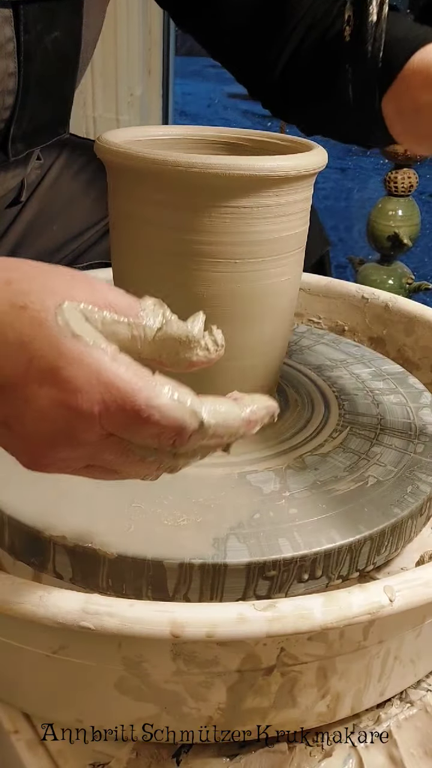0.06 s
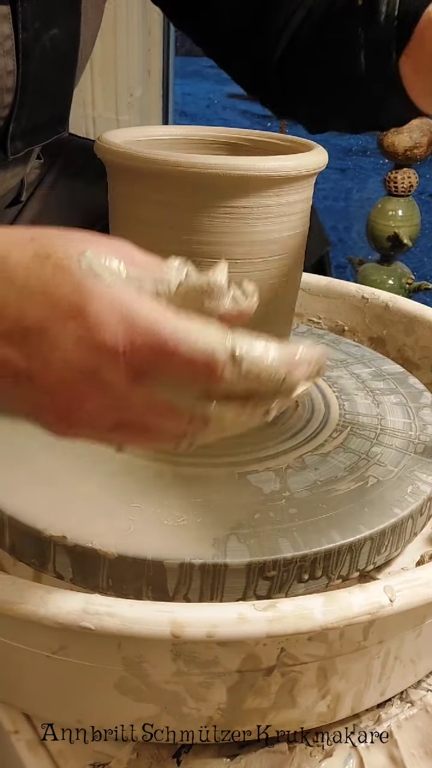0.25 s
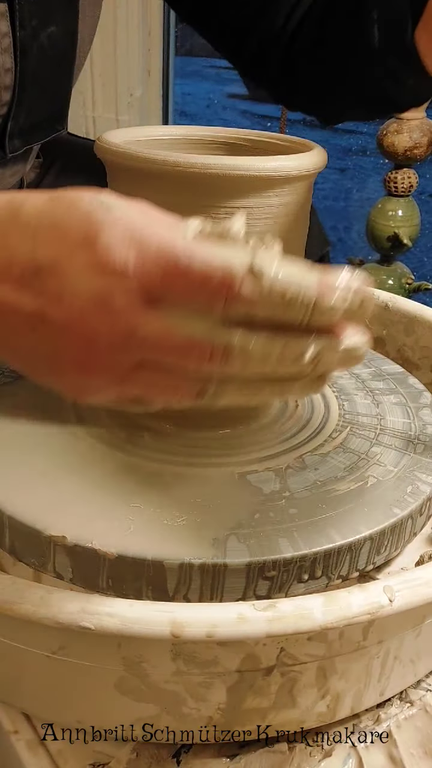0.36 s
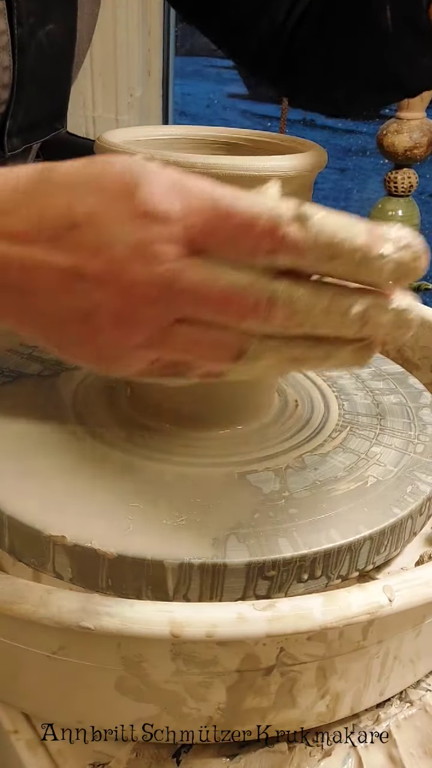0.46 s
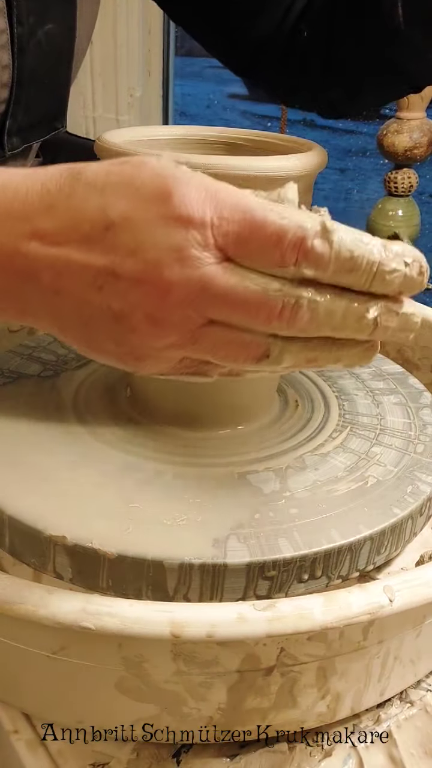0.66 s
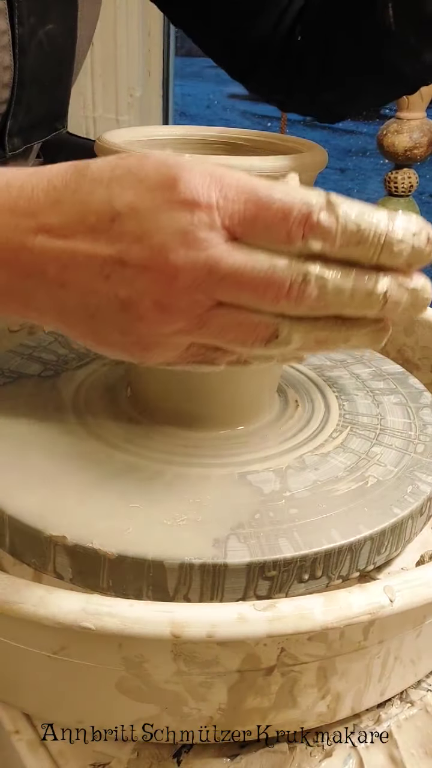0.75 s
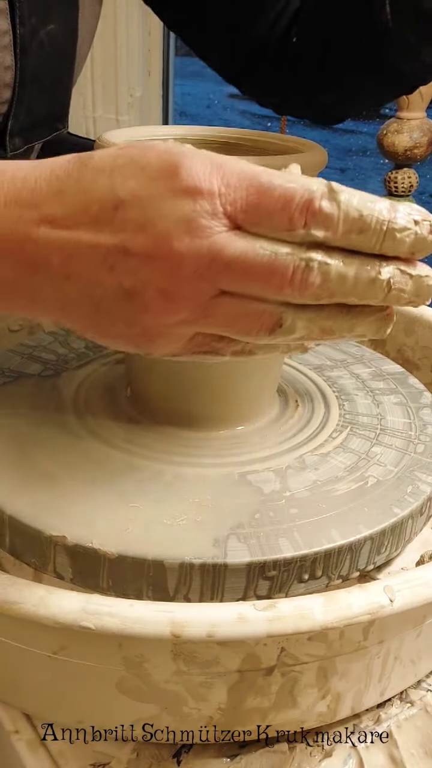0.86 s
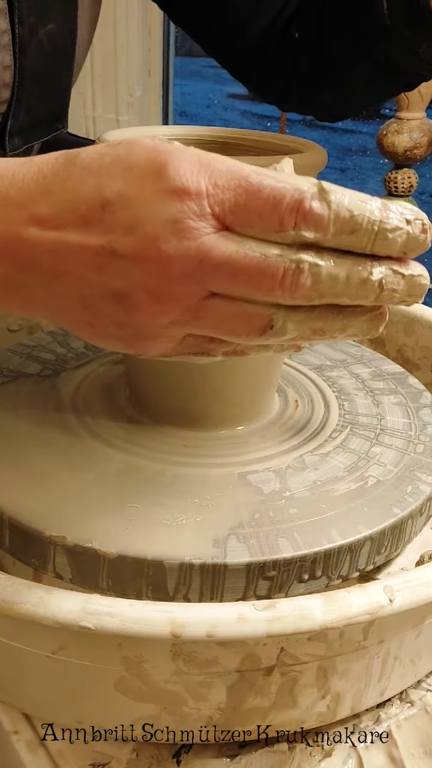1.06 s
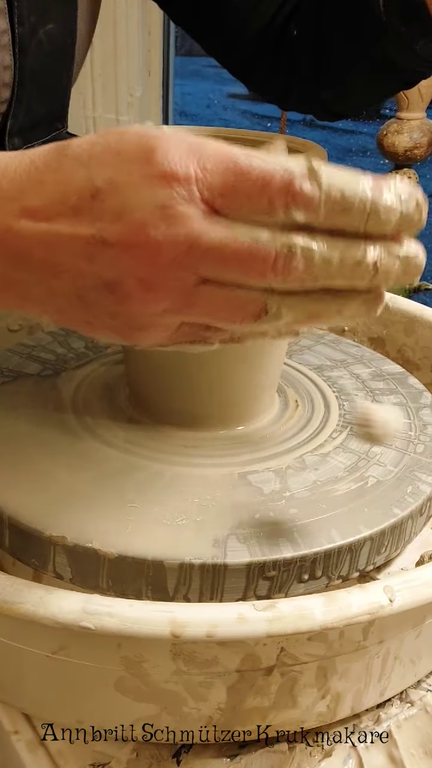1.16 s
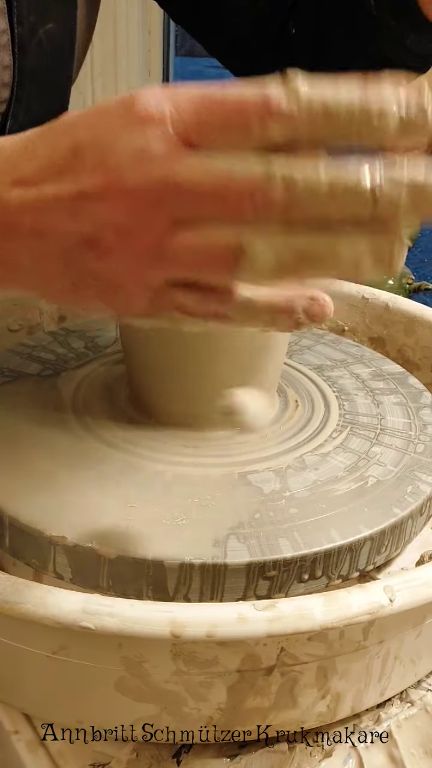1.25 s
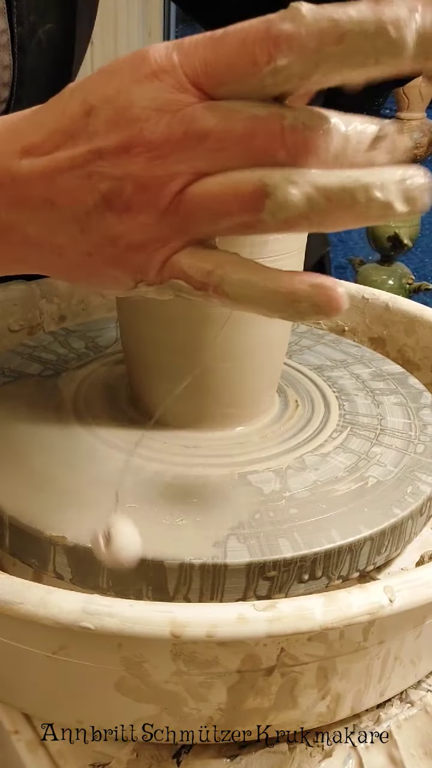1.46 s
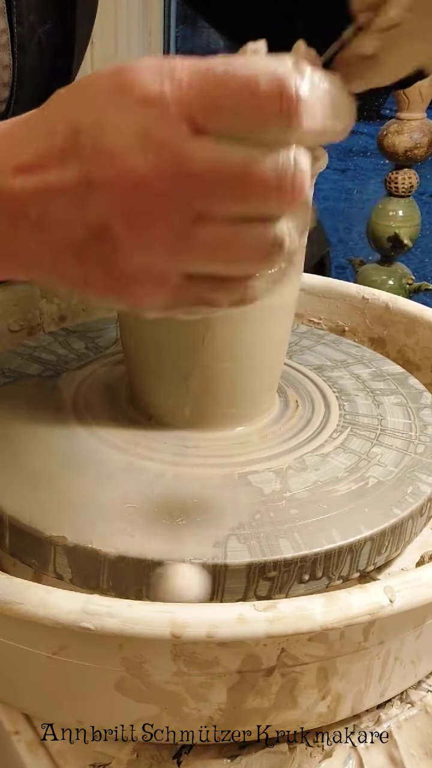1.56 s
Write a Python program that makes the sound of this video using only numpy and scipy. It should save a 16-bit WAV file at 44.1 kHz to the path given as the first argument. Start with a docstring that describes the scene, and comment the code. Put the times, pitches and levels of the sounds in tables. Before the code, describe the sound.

Wet hands rub a clay pot on a turning wheel in short hissing, scraping strokes with thin squeals; dull knocks rattle the tray, then a tap and clack, close stereo microphones in a small quiet studio.

```python
"""Wet hands rub a clay pot on a turning wheel: five strokes hiss, scrape and drum, with thin squeals.
Dull knocks ring the wheel's tray, a hard tap and a clack follow, and wet clay ticks now and then.
Under it all the wheel rumbles, groans, hums and whines in a small, quiet studio.
Shaped noise makes the rubbing and rumble; dying sine modes and noise bursts make the impacts;
drifting sines make the groans and narrow noise makes the squeals."""
import sys
import numpy as np
from scipy import signal
from scipy.fft import rfft, irfft
from scipy.io import wavfile

SR = 44100
rng = np.random.default_rng(int(sys.argv[2]) if len(sys.argv) > 2 else 0)


def dump_mix(stems):
    """Bounce the given channels to the path in sys.argv[1] as a 16-bit WAV at rate SR."""
    frames = np.atleast_2d(stems).T  # one column per channel
    limited = np.clip(frames, -1, 1)  # hard clip at full scale
    pcm = np.round(limited * 32767).astype(np.int16)
    wavfile.write(sys.argv[1], SR, pcm)


N = 70560  # samples: 1.6 s


def amp(db):
    """Decibels to gain."""
    return 10 ** (np.asarray(db) / 20)


def unit(x):
    """Scales to an rms of one."""
    return x / np.sqrt(np.mean(x ** 2) + 1e-20)


def read(points, hz):
    """Reads a curve on a log-frequency axis."""
    f, value = np.transpose(points)
    return np.interp(np.log(hz + 1), np.log(f + 1), value)


def pan(db):
    """Left and right gains; positive leans left."""
    return amp([[db / 2], [-db / 2]])


def add(mix, s, sound):
    """Mixes a sound in at a time in seconds."""
    part = mix[:, round(s * SR):][:, :sound.shape[1]]
    part += sound[:, :part.shape[1]]


def swell(start, end, rise_s, fall_s):
    """Attack, hold and release."""
    t = np.arange(N) / SR
    return np.clip((t - start) / rise_s, 0, 1) * np.clip((end - t) / fall_s, 0, 1)


def wander(rate_hz):
    """Smooth random drift of rms one; its spectrum fades away around the rate."""
    hz = np.fft.rfftfreq(N, 1 / SR)
    fade = np.exp(-(hz / rate_hz) ** 2) * (hz > 0)
    return unit(irfft(rfft(rng.standard_normal(N)) * fade, N))


# Stereo likeness of the two microphones: f/Hz, left-right correlation
LIKENESS = [(50, 0.35), (150, 0.88), (330, 0.85), (700, 0.48), (1400, -0.19), (4000, 0.23), (10000, -0.049)]


def likeness(hz):
    """How alike left and right are at a frequency, from -1 to 1."""
    return np.clip(read(LIKENESS, hz), -1, 1)


def stereo_pair(a, b, same):
    """Left is the first signal; right shares as much of it as the likeness asks."""
    return np.array([a, same * a + np.sqrt(1 - same ** 2) * b])


# Stereo balance of broad noise and squeals: f/Hz, left over right/dB
BALANCE = [(50, 3), (150, 7.5), (350, -0.5), (700, 1.5), (1400, 2), (3200, 4.5), (6000, 2), (9000, 1),
           (14000, -3)]


def noise(colour):
    """Coloured noise of rms one, as two close microphones hear it."""
    hz = np.fft.rfftfreq(N, 1 / SR)
    a, b = rfft(rng.standard_normal((2, N)))
    lean, db = read(BALANCE, hz) / 2, read(colour, hz)
    tilt = amp([db + lean, db - lean])
    return unit(irfft(stereo_pair(a, b, likeness(hz)) * tilt, N))


def fuzzy_tone(hz, width_hz):
    """A narrow resonance kept ringing by friction, as noise riding on a tone."""
    turn = np.exp(2j * np.pi * hz * np.arange(N) / SR)
    a, b = (unit((turn * (wander(width_hz) + 1j * wander(width_hz))).real) for _ in range(2))
    return pan(read(BALANCE, hz)) * stereo_pair(a, b, likeness(hz))


def ring(modes, t):
    """A struck body's dying modes; left and right phases part as likeness falls."""
    out = np.zeros((2, len(t)))
    for k, (hz, db, t60, lean_db) in enumerate(modes):
        apart = np.arccos(likeness(hz)) * np.array([[.5], [-.5]])
        decay = amp(db - 60 * t / t60)
        sign = (-1) ** k  # neighbouring modes start in opposite directions
        out += sign * pan(lean_db) * decay * np.sin(2 * np.pi * hz * t + apart)
    return out


def burst(colour, envelope, rise_s=0, push=0):
    """A noise burst, with an optional push of contact, heard through a body's colour."""
    size = 4096
    hz = np.fft.rfftfreq(size, 1 / SR)
    log_gain = np.log(unit(amp(read(colour, hz))))
    log_gain = np.concatenate([log_gain, log_gain[-2:0:-1]])
    # minimum phase: the body answers at once
    body = np.fft.ifft(np.exp(signal.hilbert(log_gain).conj())).real
    shower = noise([(20, 0), (20000, 0)])[:, :len(envelope)] * envelope
    shower[:, round(rise_s * SR)] += push
    return signal.fftconvolve(shower, body[None], axes=1)[:, :len(envelope)]


# Studio decay: f/Hz, t60/s
ROOM_DECAY = [(100, 0.75), (350, 0.3), (650, 0.5), (1300, 0.43), (2500, 0.39), (4500, 0.28), (12000, 0.21)]
ROOM_START_S = 0.0051


def room(x):
    """The studio's echo: sparse random taps, each band dying at its own speed."""
    size = SR * 3 // 4
    taps = rng.standard_normal((2, size)) * (rng.random((2, size)) < .12)
    taps *= np.arange(size) > ROOM_START_S * SR
    hz, t, bands = signal.stft(taps, SR, nperseg=256)
    bands = stereo_pair(bands[0], bands[1], likeness(hz)[:, None])
    decay = amp(-60 * t / read(ROOM_DECAY, hz)[:, None])
    tail = signal.istft(bands * decay, SR, nperseg=256)[1]
    return signal.fftconvolve(x, tail / np.linalg.norm(tail[0]), axes=1)[:, :N]


# Faint steady hiss: f/Hz, relative level/dB per Hz
AIR_COLOUR = [(1000, -1), (3000, -13.5), (8000, -2), (12500, -7.5), (15500, -3.5), (17000, -23.5)]
AIR_DB = -79.5


def air():
    """A faint steady hiss of shaped noise."""
    return amp(AIR_DB) * noise(AIR_COLOUR)


# Motor hum, then thin electric whine: level/dB, left over right/dB
HUM_LEVELS = [(-69.5, 9.5), (-77.5, 14.5)]
HUM_HZ, WHINE_HZ = 55, 15622
HUM_WAVER = 0.24  # rms share of the level


def hums():
    """The motor hums and the electrics whine: two steady tones whose levels waver."""
    out, t = np.zeros((2, N)), np.arange(N) / SR
    for hz, (db, lean_db) in zip((HUM_HZ, WHINE_HZ), HUM_LEVELS):
        level = np.sqrt(2) * amp(db) * (1 + HUM_WAVER * wander(rate_hz=5))
        out += pan(lean_db) * level * np.sin(2 * np.pi * (hz * t + rng.random()))
    return out


# Wheel rumble: f/Hz, relative level/dB per Hz
RUMBLE_COLOUR = [(20, -40), (38, -16.5), (55, -9), (85, -8), (140, -5), (190, -6.5), (235, 0.5),
                 (290, -5.5), (345, -6.5), (450, -11), (800, -22.5), (1400, -32), (5000, -48.5)]
RUMBLE_DB, RUMBLE_SWELL_DB = -61, 2.5  # base level, rms drift


def rumble():
    """The bearing rumbles: low noise that swells and sinks at random."""
    return amp(RUMBLE_DB + RUMBLE_SWELL_DB * wander(rate_hz=20)) * noise(RUMBLE_COLOUR)


# Groans of the turning wheel: start t/s, end t/s, start f/Hz, end f/Hz, level/dB
GROANS = [(0, 0.131, 188, 185, -61), (0.533, 0.738, 330, 327.4, -53.5), (0.675, 0.814, 255, 240, -55.5),
          (0.764, 0.86, 315, 339.4, -48.5), (1.036, 1.154, 325, 357, -59.5), (1.151, 1.27, 275, 282, -59),
          (1.178, 1.388, 361.7, 332, -61.5), (1.308, 1.421, 236, 228.6, -58)]
GROAN_DRIFT_HZ, GROAN_EDGE_S = 7.7, .04  # rms pitch drift, fade in and out


def groans():
    """The bearing groans: gliding tones with unsteady pitch and level."""
    out, t = np.zeros((2, N)), np.arange(N) / SR
    for start, end, from_hz, to_hz, db in GROANS:
        hz = np.interp(t, [start, end], [from_hz, to_hz]) + GROAN_DRIFT_HZ * wander(rate_hz=52)
        level = np.sqrt(2) * amp(db + 1.65 * wander(rate_hz=25))
        level *= swell(start, end, GROAN_EDGE_S, GROAN_EDGE_S)
        out += level * np.sin(2 * np.pi * np.cumsum(hz) / SR)
    return out


# Ticks of wet clay: t/s, level/dB, decay to 1/e t/s
TICKS = [(0.066, -60.5, 0.0045), (0.38, -50.5, 0.0022), (0.414, -54.5, 0.0027), (1.082, -53, 0.0028),
         (1.365, -62, .003), (1.404, -64.5, 0.0098)]
# Tick colour: f/Hz, relative level/dB per Hz
TICK_COLOUR = [(500, -12.5), (2500, -15), (4500, -8.5), (8000, -5), (12000, -1.5), (15500, -3)]


def ticks():
    """Films of wet clay snap, each a tiny bright burst of noise."""
    out, t = np.zeros((2, N)), np.arange(SR // 20) / SR
    for s, db, decay_s in TICKS:
        add(out, s, amp(db) * noise(TICK_COLOUR)[:, :len(t)] * np.exp(-t / decay_s))
    return out


# Dull knocks and tray chatter: t/s, level/dB, treble cutoff f/Hz, left over right/dB
KNOCKS = [(0.2785, -28, 2300, 5), (0.2826, -22, 3000, -0.5), (0.2998, -31, 1250, 2.5),
          (0.3123, -27, 890, 0), (0.326, -28.5, 790, -1), (0.341, -33, 1280, -7.5), (0.354, -35, 850, -2),
          (0.573, -35, 480, -3), (0.6303, -29, 879.6, -2), (.643, -34, 800, -3), (.783, -35, 300, 4)]
# Ring of the tray: f/Hz, level/dB, t60/s, left over right/dB
TRAY_MODES = [(56, -29, .55, 3), (138, -26, .15, 2), (248, -11, .18, 0), (345, -17, .1, 0),
              (700, -13, .13, -2), (765, -11, .08, -1), (868, -2, .06, -1), (1113, -.5, .085, 3),
              (1348, -1, .095, 6), (1519, -19, .1, 2), (1820, -20, .06, 0), (2600, -18, .08, 0)]
# Thud colour: f/Hz, relative level/dB per Hz
THUD_COLOUR = [(40, -22), (130, -12), (250, 1), (500, -2.5), (850, -1), (1400, 1.5), (2000, -10.5),
               (3000, -9.5), (6000, -24), (15000, -56.5)]
THUD_T60, KNOCK_RISE_S = 0.058, 0.0022
# the ring stays close; the thud spreads through the room
RING_ROOM_DB, THUD_ROOM_DB = -24.5, -11.5


def knocks():
    """Soft blows thud and ring the tray; each blow's softness sets its treble cutoff."""
    rings, thuds, t = np.zeros((2, N)), np.zeros((2, N)), np.arange(SR // 2) / SR
    rise = 1 - np.exp(-t / KNOCK_RISE_S)
    for s, db, soft_hz, lean_db in KNOCKS:
        soft = signal.butter(6, soft_hz, fs=SR, output="sos")
        gain = amp(db) * pan(lean_db)
        thud = burst(THUD_COLOUR, rise * amp(-60 * t / THUD_T60))
        add(rings, s, gain * signal.sosfilt(soft, rise * ring(TRAY_MODES, t)))
        add(thuds, s, gain * signal.sosfilt(soft, thud))
    return rings + thuds + room(amp(RING_ROOM_DB) * rings + amp(THUD_ROOM_DB) * thuds)


# Hard contacts, tap then clack:
# t/s, level/dB, ring level/dB, body t60/s, room level/dB, left over right/dB
CLACKS = [(0.8796, -26.5, -13, 0.077, -14.5, -2), (0.9802, -26, -8.5, 0.084, -10, -2)]
# Tap colour: f/Hz, relative level/dB per Hz
TAP_COLOUR = [(50, -30), (150, -13), (370, 7), (750, -2), (1150, 2), (1600, -1), (2300, 0), (3000, -6),
              (3800, -19.5), (5500, -7), (7000, -21.5), (12000, -25.5), (15500, -35.5)]
# Clack colour: f/Hz, relative level/dB per Hz
CLACK_COLOUR = [(50, -14.5), (130, -7), (260, -11.5), (430, 8.5), (580, 7), (800, -1), (1100, -3),
                (2400, -2.5), (3400, -11.5), (4200, -6), (5100, -7), (6000, -21), (12000, -24.5),
                (15500, -29)]
# Ring of both contacts: f/Hz, level/dB, t60/s, left over right/dB
CLACK_MODES = [(474.5, -3, 0.12, 0.5), (576, -4, 0.13, 10.5), (750, -9.5, 0.05, -3),
               (925, -9.5, 0.087, 14.5), (1016, -4.5, 0.1, 2), (1857, -13.5, 0.26, 9),
               (4040, -10.5, 0.0049, 1.5), (4970, 0, 0.013, 9.5)]
CRACK_FADE_S, CRACK_RISE_S = 0.0022, 0.0003  # fall to 1/e, linear attack
CLACK_BODY_DB, CONTACT_DB = -6.5, 8  # dry body, single push of first contact


def clacks():
    """Hard contacts: a short crack, a dry body and a few quick modes."""
    out, t = np.zeros((2, N)), np.arange(SR // 4) / SR
    rise = np.minimum(t / CRACK_RISE_S, 1)
    for contact, colour in zip(CLACKS, (TAP_COLOUR, CLACK_COLOUR)):
        s, db, ring_db, body_t60, room_db, lean_db = contact
        crack = np.exp(-(t / CRACK_FADE_S) ** 2)
        body = amp(CLACK_BODY_DB - 60 * t / body_t60)
        impact = burst(colour, rise * (crack + body), CRACK_RISE_S, amp(CONTACT_DB))
        ringing = amp(ring_db) * rise * ring(CLACK_MODES, t)
        hit = np.zeros((2, N))
        add(hit, s, amp(db) * pan(lean_db) * (impact + ringing))
        out += hit + amp(room_db) * room(hit)
    return out


SQUEAL_RISE_S, SQUEAL_FALL_S = 0.047, 0.044


def squeal(times, tones):
    """Sliding skin grips wet clay and holds a few thin tones."""
    level = sum(amp(db) * swell(start, end, SQUEAL_RISE_S, SQUEAL_FALL_S)
                for start, end, db in times)
    return level * sum(amp(db) * fuzzy_tone(hz, width) for hz, width, db in tones)


# Strokes: start t/s, hardest t/s, end t/s, then peak hiss, rub and scrape level/dB
STROKES = [(0, 0.053, 0.093, -73, -57, -64), (0.13, 0.245, 0.4, -48, -52.5, -48),
           (0.466, 0.59, 0.73, -55, -47.5, -52), (0.728, 0.79, 0.86, -57, -42.5, -50.5),
           (0.813, 0.899, 0.97, -49, -51.5, -75)]
# Resting touch: hiss, rub and scrape level/dB
TOUCH_DB = [-79.5, -63.5, -70]
# Hiss of the wet skin: f/Hz, relative level/dB per Hz
HISS_COLOUR = [(200, -31.5), (1500, -36), (2000, -1), (2800, 2), (3700, -4), (4800, 0.5), (6300, -8.5),
               (8000, -3), (10500, -12.5), (12000, -1), (13400, -8), (15500, -31.5)]
# Drumming of the pot under the hand: f/Hz, relative level/dB per Hz
RUB_COLOUR = [(30, -42), (90, -29), (140, 2), (185, -12), (245, -3), (330, 3.5), (450, -8), (600, -8.5),
              (1000, -22), (3000, -63)]
# Scraping of the clay: f/Hz, relative level/dB per Hz
SCRAPE_COLOUR = [(200, -23), (450, -6.5), (720, 7.5), (1100, -4), (1400, 4), (1950, -3.5), (2600, -13.5),
                 (5000, -17.5)]
# Thin squeals of skin on wet clay: start t/s, end t/s, level/dB
SQUEAL_TIMES = [(.135, .365, -54), (.515, .65, -56), (.752, .975, -53)]
# Squeal tones: f/Hz, width f/Hz, relative level/dB
SQUEAL_TONES = [(3210, 50, -3.5), (4730, 70, -14), (5230, 52, -7)]
# Faint lower squeak as the third stroke lets go: start t/s, end t/s, level/dB
SQUEAK_TIMES = [(.65, .735, -60)]
# Squeak tones: f/Hz, width f/Hz, relative level/dB
SQUEAK_TONES = [(1500, 40, -1), (1877, 40, -1.1), (2300, 60, 0)]
PRESS_CURVE, LET_GO_CURVE = 0.94, 1.3  # exponents of the stroke's rise and fall
LIFT_S, LIFT_FADE_S = 1.137, 0.061  # the hand starts to lift off the pot, and its fade
HISS_ROUGH_DB, HISS_SLIP_DB, RUB_ROUGH_DB, SCRAPE_ROUGH_DB = 1.6, 0.89, 1.65, 2.6  # rms
HANDS_ROOM_DB = -12.5


def hands():
    """Each stroke presses and lets go; skin hisses, clay scrapes and the pot drums."""
    t = np.arange(N) / SR
    touch = np.clip((LIFT_S - t) / LIFT_FADE_S + 1, 0, 1)
    power = (amp(TOUCH_DB)[:, None] * touch) ** 2
    for start, top, end, *levels_db in STROKES:
        press = np.clip((t - start) / (top - start), 0, 1) ** PRESS_CURVE
        let_go = np.clip((end - t) / (end - top), 0, 1) ** LET_GO_CURVE
        power = power + (amp(levels_db)[:, None] * press * let_go) ** 2
    hiss_level, rub_level, scrape_level = np.sqrt(power)
    slip = wander(rate_hz=41)  # shared by all three layers
    hiss_rough = amp(HISS_ROUGH_DB * wander(rate_hz=250) + HISS_SLIP_DB * slip)
    out = hiss_level * noise(HISS_COLOUR) * hiss_rough
    out += rub_level * noise(RUB_COLOUR) * amp(RUB_ROUGH_DB * slip)
    out += scrape_level * noise(SCRAPE_COLOUR) * amp(SCRAPE_ROUGH_DB * slip)
    out += squeal(SQUEAL_TIMES, SQUEAL_TONES) + squeal(SQUEAK_TIMES, SQUEAK_TONES)
    return out + amp(HANDS_ROOM_DB) * room(out)


def scene():
    """Everything at the wheel, from the background to the hands."""
    wheel = rumble() + groans() + hums()
    return air() + wheel + ticks() + knocks() + clacks() + hands()


def record(dry):
    """The recorder's band limit: a steep low-pass at 15950 Hz."""
    low_pass = signal.firwin(711, 15950, window=("kaiser", 8), fs=SR)
    return signal.oaconvolve(dry, low_pass[None], "same")


dry = scene()
out = record(dry)
dump_mix(out)
```